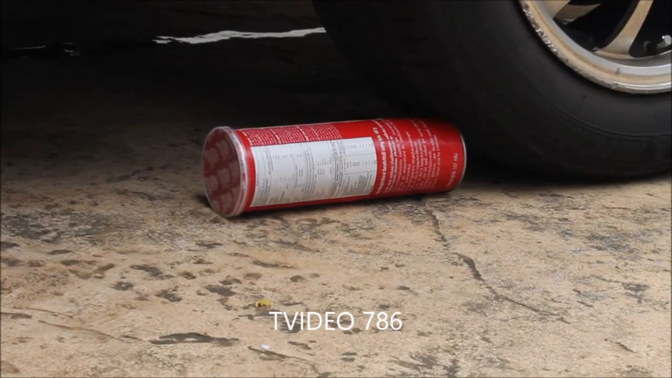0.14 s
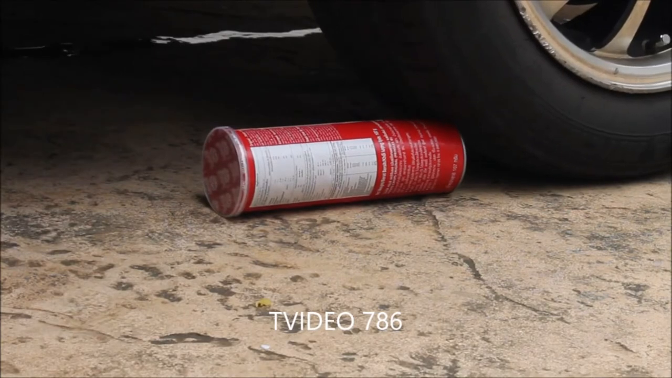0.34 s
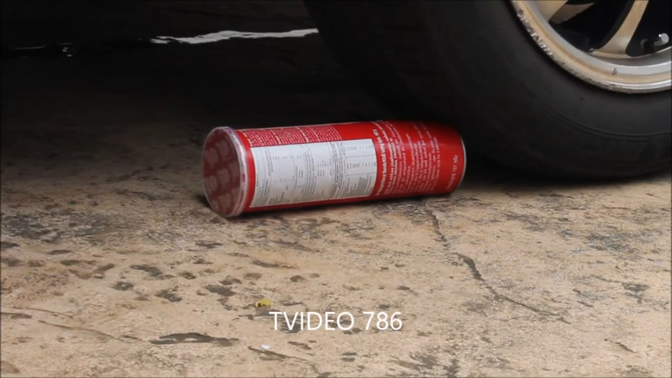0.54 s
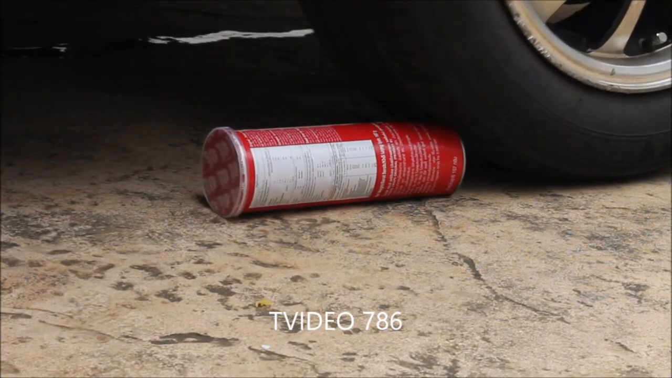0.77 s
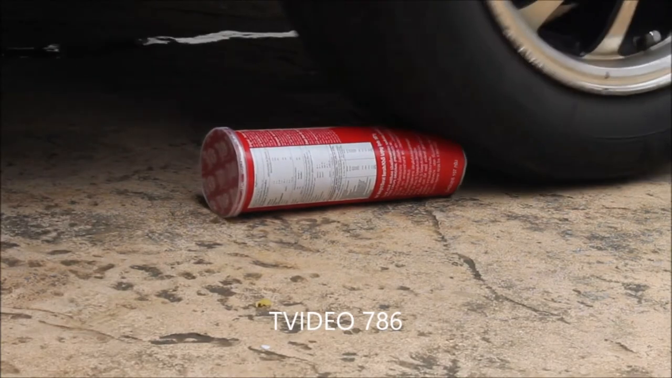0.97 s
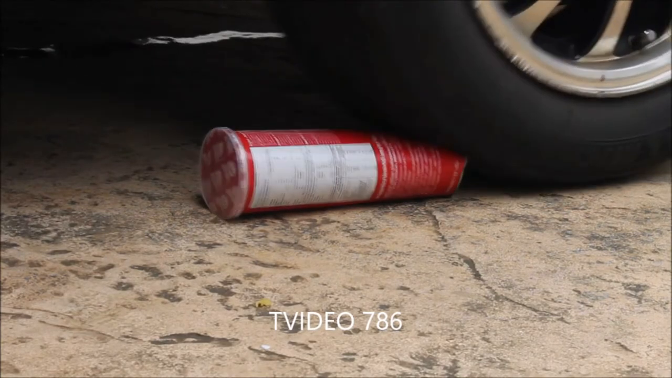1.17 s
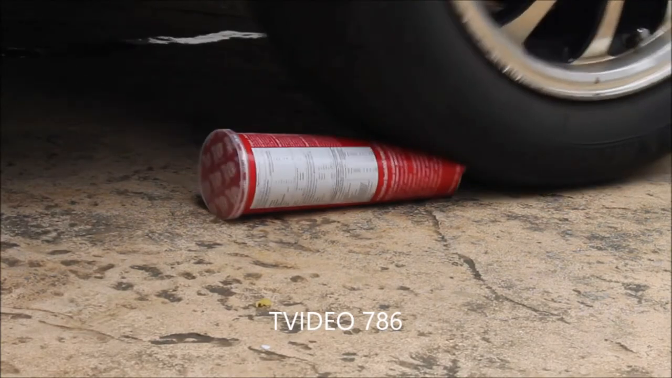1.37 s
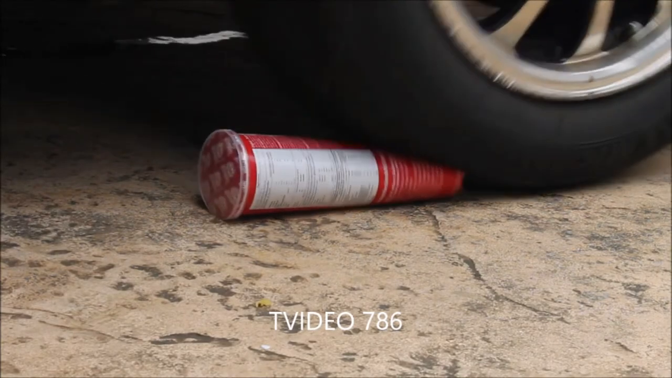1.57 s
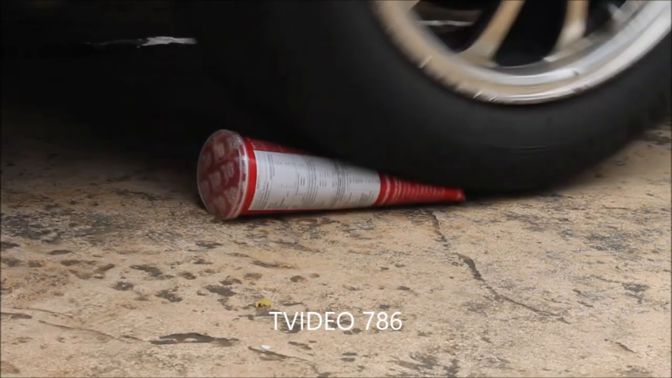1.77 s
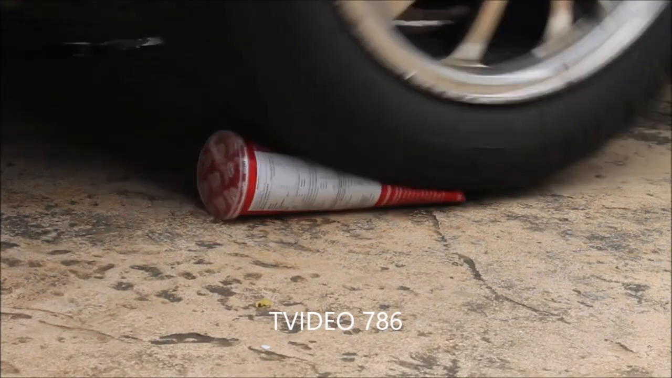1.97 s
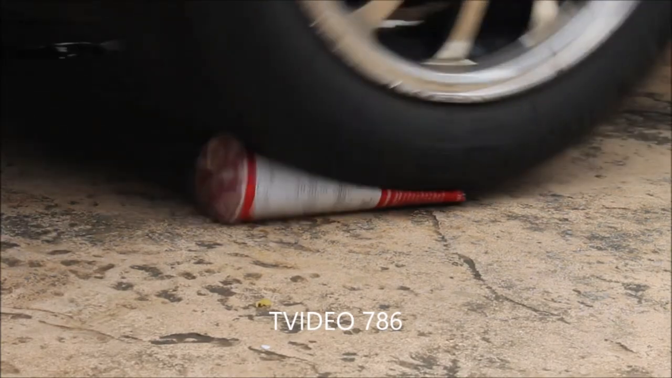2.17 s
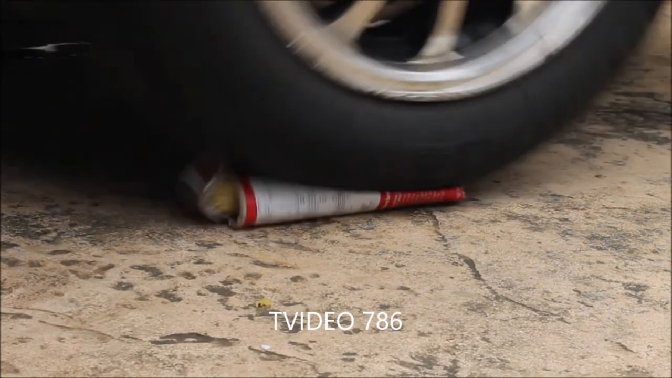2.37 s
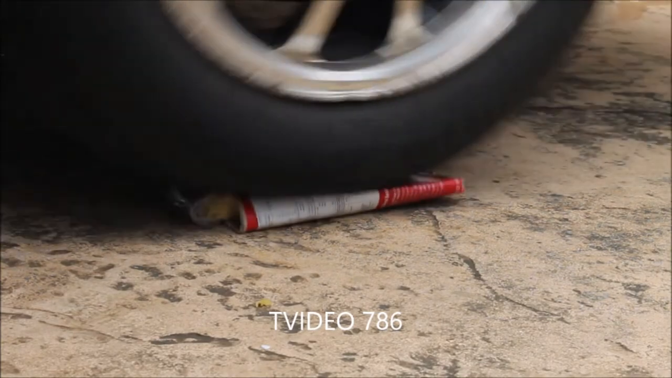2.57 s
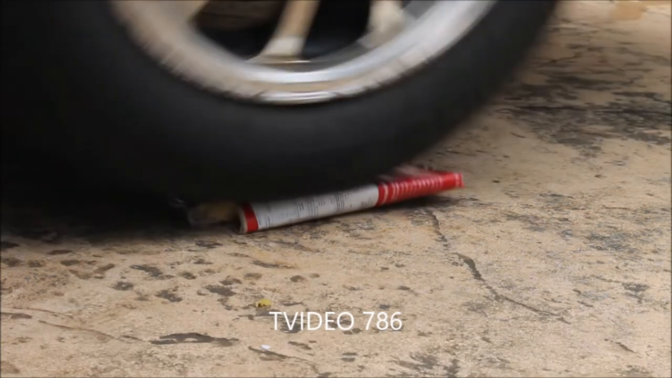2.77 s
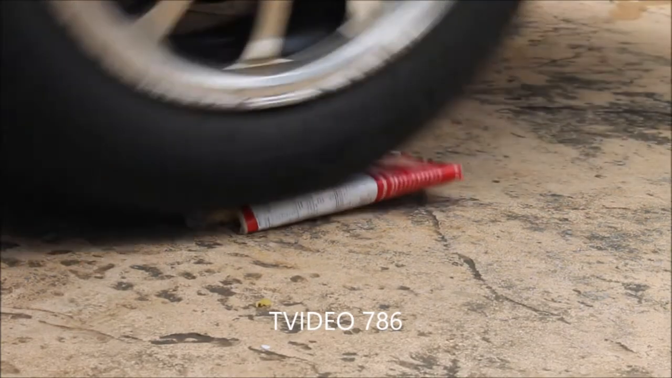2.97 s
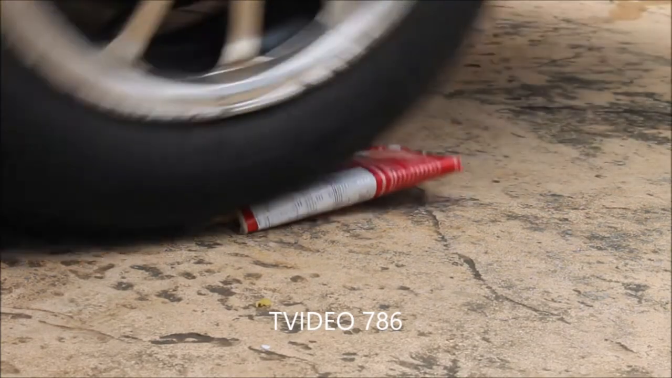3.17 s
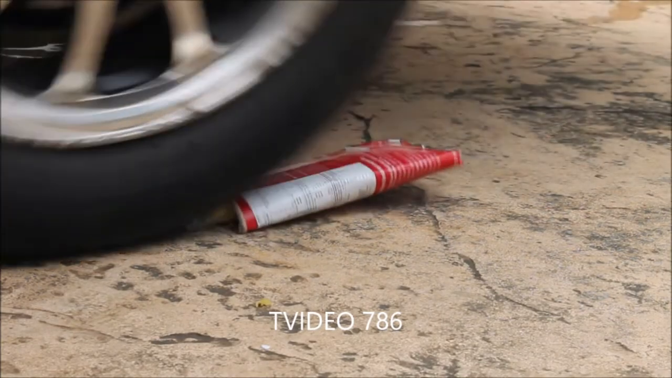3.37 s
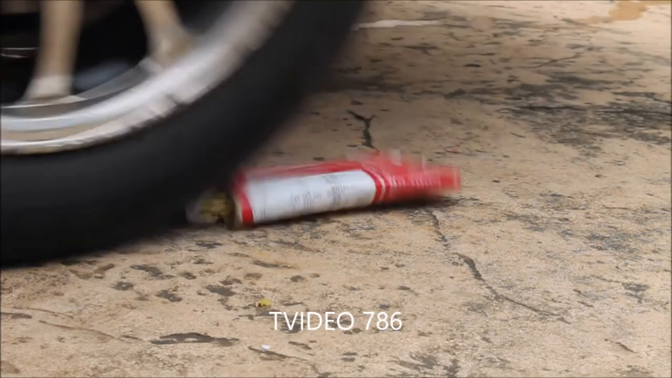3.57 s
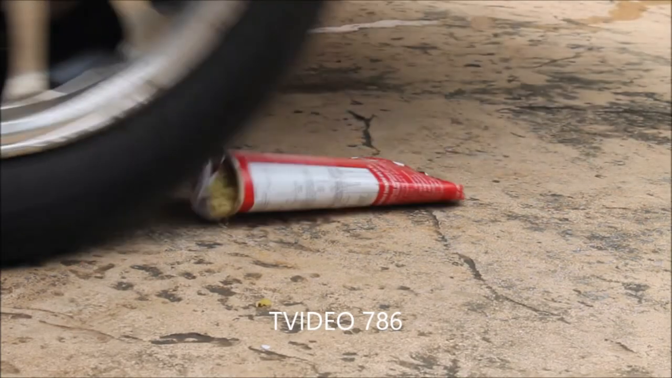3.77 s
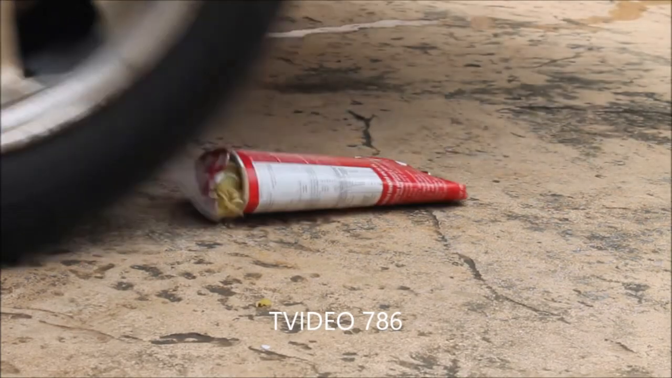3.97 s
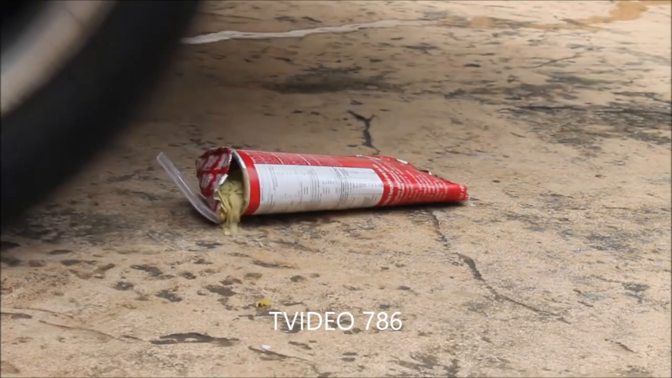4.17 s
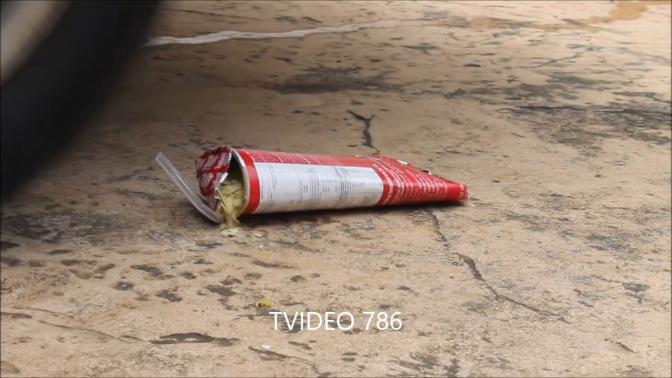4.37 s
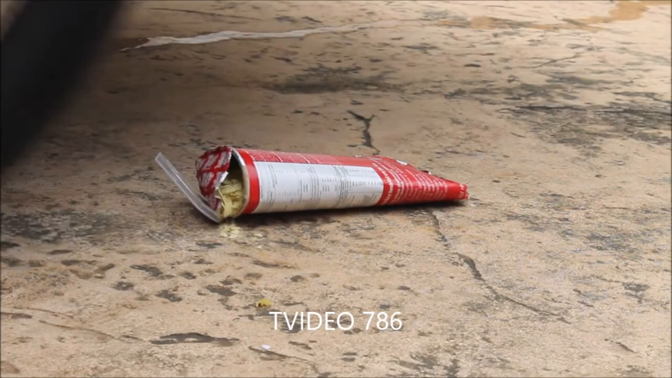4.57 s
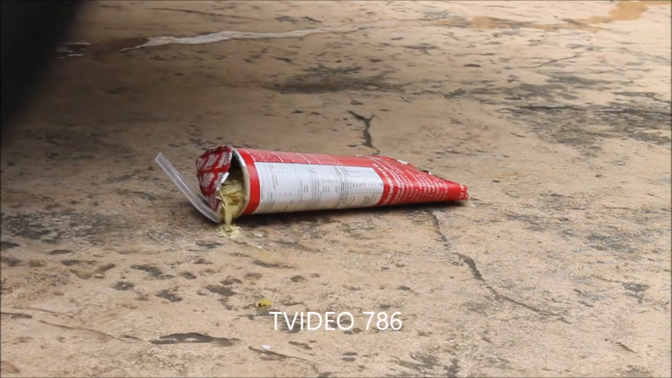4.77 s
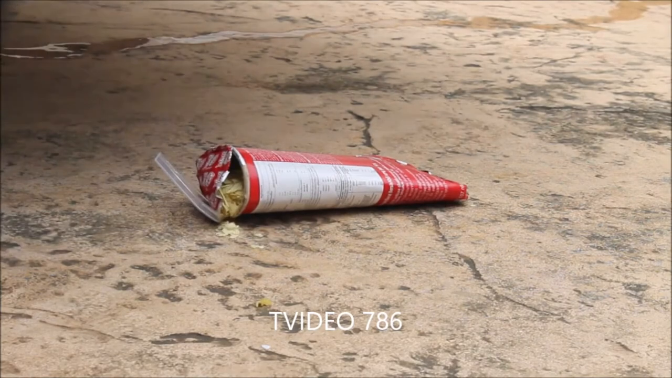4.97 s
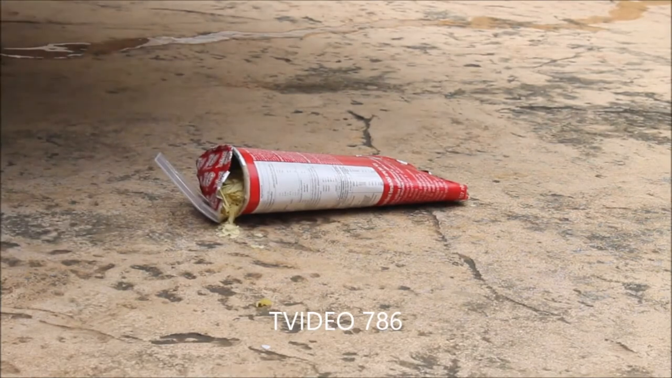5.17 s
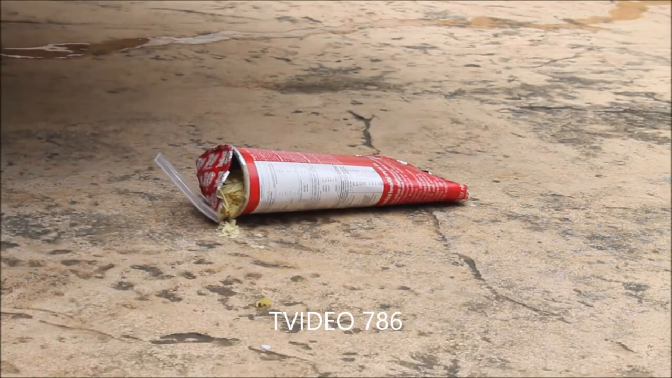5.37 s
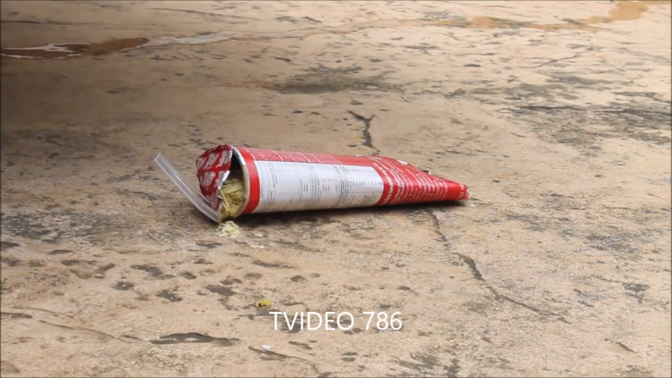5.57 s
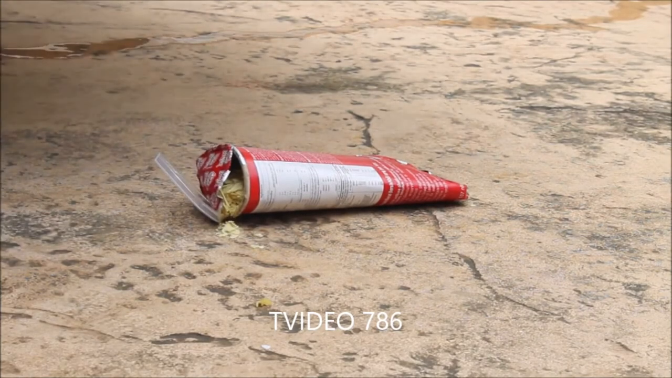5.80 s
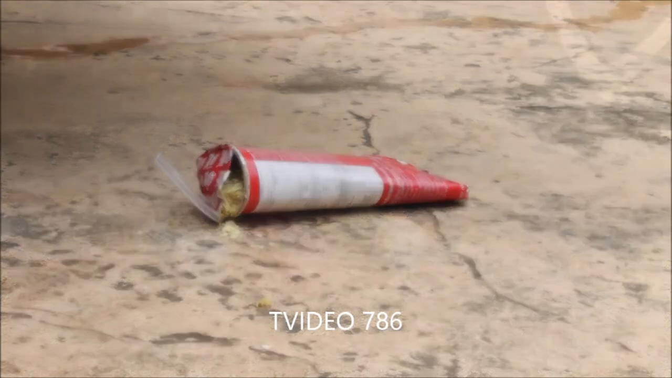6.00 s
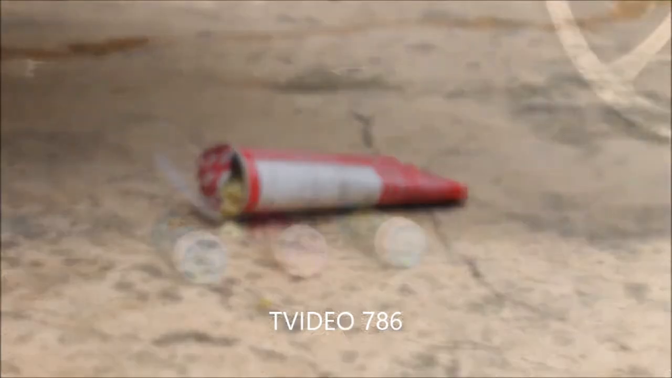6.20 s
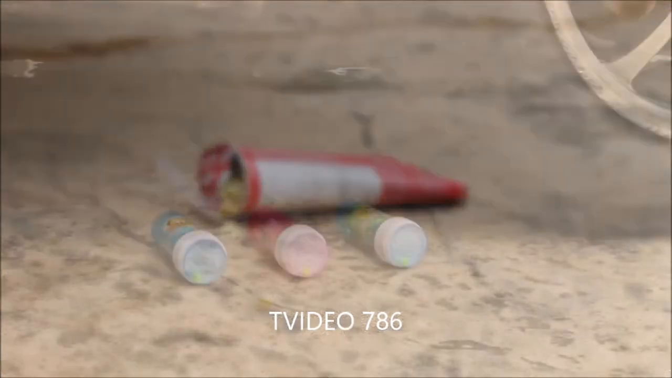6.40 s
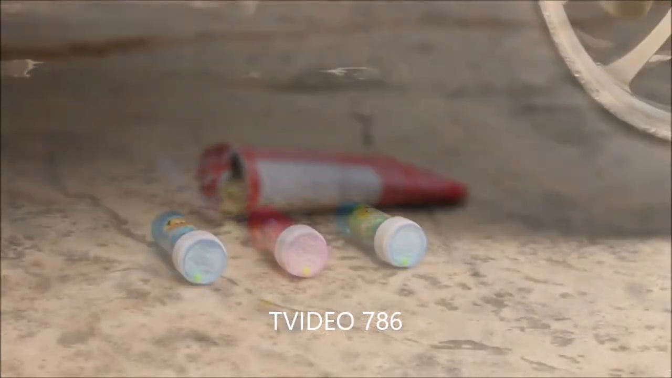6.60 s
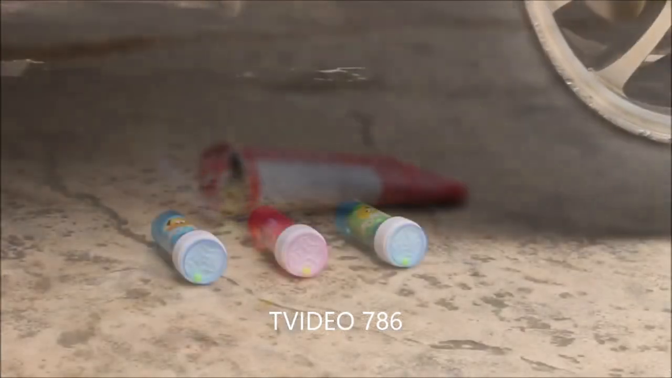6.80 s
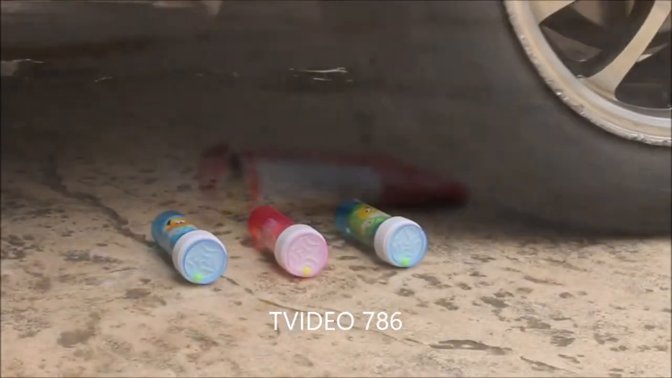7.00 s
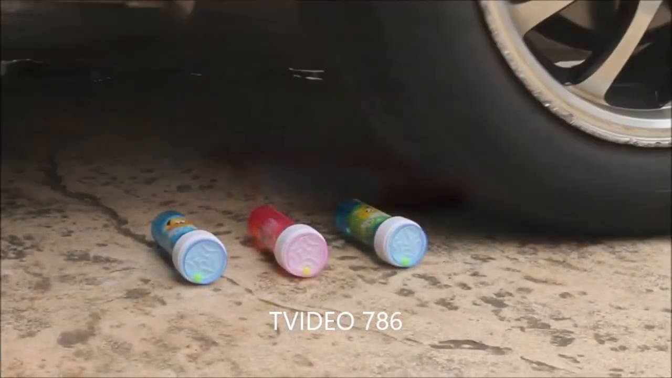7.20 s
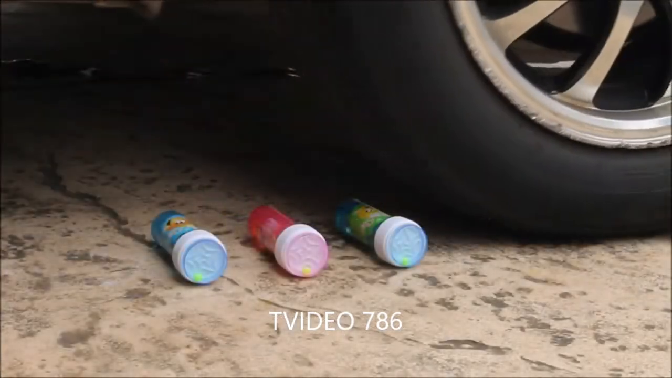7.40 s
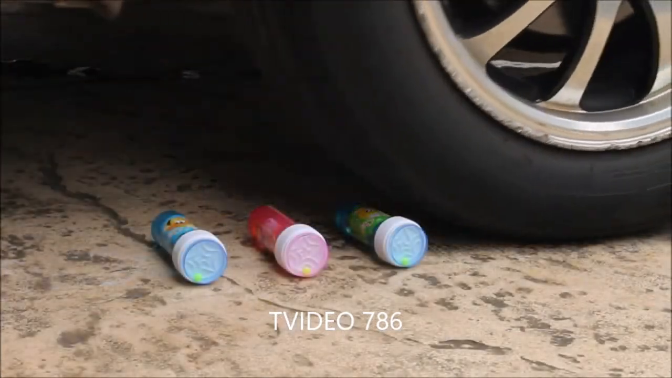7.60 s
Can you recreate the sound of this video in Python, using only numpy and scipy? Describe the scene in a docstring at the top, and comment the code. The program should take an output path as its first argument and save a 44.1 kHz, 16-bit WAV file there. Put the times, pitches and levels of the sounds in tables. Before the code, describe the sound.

A car creeps over concrete with a low engine throb and gritty rumble. After about a second, a cardboard tube of crisps bursts under the tyre with a very loud, close crack. It buckles with hollow thumps, then crunches and snaps for over two seconds. One small scrape follows, leaving only the rumble. Near the end, the sound switches abruptly to the brighter, steady hiss and hum of the waiting car.

```python
"""A cardboard tube of crisps is crushed on a concrete floor by a creeping car, its engine ticking over.
The tube bursts with a crack that overloads the microphone, buckles in steps and rings hollow until flat.
The crisps crunch by brittle fracture, the lid pops off, and once the tyre has left, the open end springs
back and skids. At six seconds the scene cuts to the car waiting, with a brighter, steady hiss."""
import sys
import numpy as np
from scipy import signal
from scipy.fft import rfft, irfft
from scipy.io import wavfile
from scipy.ndimage import uniform_filter1d

SR = 44100
rng = np.random.default_rng(int(sys.argv[2]) if len(sys.argv) > 2 else 0)


def digitize_waveform(pressure):
    """Quantize a signal to 16-bit integers and store it at the path in sys.argv[1].

    Rows of a 2-D input are taken as channels; values are limited to [-1, 1].
    """
    field = np.atleast_2d(pressure).T
    bounded = np.clip(field, -1, 1)
    quanta = np.round(bounded * 32767).astype(np.int16)
    wavfile.write(sys.argv[1], SR, quanta)


N = 337365
T = np.arange(N) / SR
BURST_S, FLAT_S, FREED_S = 1.01, 1.45, 3.6  # the tube bursts, lies flat and split, leaves the tyre
CUT_S = 6.033
ROLL = (0.082, 0.82, 2.41, 1.6)  # the car moves: start/s, attack/s, hold/s, release/s


def buckles(tail_t60=0.054, rustle_db=-13, rustle_t60=0.08, thump_cycles=8.8, sag=0.13):
    """Buckling: each fold of the wall tears, thumps and rustles; the pitch sags as stiffness is lost."""
    # folds: t/s, tear level/dB, tear duration/s, thump f/Hz, thump level/dB
    folds = [(0.402, -40, 0.0034, 128, -11), (0.7477, -31, 0.0028, 376, -2.5),
             (1.0078, -1, 0.0061, 152, 3.5), (1.0172, -13, 0.0033, 368, 0), (1.231, -9.5, 0.0031, 483, -12),
             (1.36, -12, 0.0048, 209, -5.5), (1.402, -14, 0.01, 400, -15), (1.419, -7.5, 0.0041, 443, 5),
             (2.252, -11, 0.0073, 286, -3.5), (2.406, -9, 0.0073, 332, 2.5), (2.418, -23, 0.0069, 254, -3),
             (2.428, -24, 0.0087, 100.5, -9), (2.665, -26, 0.006, 160, -16), (2.743, -22, 0.0082, 139, -8),
             (3.846, -21, 0.0049, 247, -8.5), (3.884, -20.5, 0.0044, 615, -18)]
    # spectrum of tearing cardboard: f/Hz, level/dB
    wall_spectrum = [(60, 5.5), (170, -11), (420, 5.5), (620, -6), (950, 4.5), (1300, -1), (1700, -0.5),
                     (2300, -11.5), (3300, -12), (5800, -31)]
    tears, thumps, t = np.zeros(N), np.zeros(N), T[:SR // 6]
    for s, tear_db, length, hz, thump_db in folds:
        swell = np.minimum(0.077 + 0.38 * t / length, 1) * fade(np.maximum(t - length, 0), tail_t60)
        swell += undb(rustle_db) * fade(t, rustle_t60)
        tear = colour(rng.standard_normal(len(t)) * swell, wall_spectrum)
        add(tears, s, undb(tear_db) * tear * np.sqrt(np.mean(swell ** 2)))
        t60 = thump_cycles / hz
        thump = sine(hz * (1 - sag * np.minimum(t / t60, 1))) * fade(t, t60)
        add(thumps, s + length / 4, undb(thump_db) * thump)
    return tears, thumps


def snap(hz, treble_db, ring_cycles=6.1, attack_cycles=1.06, spray_t60=0.011):
    """Sudden release of strain: a damped tone and a spray of splinters whose treble dies first; peak 1."""
    t = T[:SR // 16]
    onset = np.minimum(t * hz / attack_cycles, 1)
    spray = rng.standard_normal(len(t)) * onset
    tone = unit(onset * np.sin(2 * np.pi * hz * t) * fade(t, ring_cycles / hz))
    rattle = undb(-12.5) * fade(t, 0.035)  # the snap sets off its neighbours and rattles under the car
    splinters = undb(-3.5) * band(spray * (fade(t, spray_t60) + rattle), 550, 2270, order=5)
    edge = undb(treble_db) * band(spray * fade(t, 0.3 * spray_t60), 2200, 5630, order=2)
    sound = tone + splinters + edge
    return sound / np.abs(sound).max()


def snaps():
    """Brittle fracture: the largest breaks of wall and crisps stand out as single transients."""
    # breaks: t/s, peak level/dB, f/Hz, treble level/dB re the tone
    breaks = [(0.7482, -16, 600, -24), (1.0087, 4, 1300, -16), (1.0113, 7.5, 926, -12),
              (1.0138, 10.5, 1600, -13), (1.0225, -3, 900, -27), (1.0712, -5, 800, -44),
              (1.1052, 2.5, 910, -24), (1.156, -10, 780, -23), (1.2319, 1, 1740, -23),
              (1.343, 1, 1870, -10), (1.3613, 0, 1170, -23), (1.4205, 5, 1100, -17), (1.425, -1, 1410, -5),
              (1.5225, -5, 1418, -12), (1.5653, -2.5, 1970, -1), (1.6502, 2, 1400, -10),
              (1.66, -10, 1750, -18), (1.6923, -3, 1100, -10), (1.701, -3, 930, -12),
              (1.7275, -7, 2000, -13), (1.7657, 0.5, 2070, -26), (1.818, -6, 910, -16),
              (1.8329, -4, 1630, -18), (1.8494, -7, 1530, -23), (1.913, -5, 730, -18),
              (1.9778, -3, 800, -28), (2.003, -0.5, 1730, -12), (2.017, -6, 880, -20),
              (2.0448, -4, 1957, -8), (2.0620, -14, 1280, -12), (2.0782, -2, 1940, -21),
              (2.096, 0.5, 645, -23), (2.1907, -3.5, 2300, 1), (2.2862, 1.5, 1640, -10),
              (2.3355, -1, 1900, -4), (2.3635, -8, 842, -9), (2.5399, -2, 670, -14),
              (2.5853, -1, 1450, -15), (2.622, -1, 1500, -8), (2.6364, -0.5, 1700, -15),
              (2.658, -8.5, 4800, 11), (2.695, -3, 1940, 0), (2.7393, -2, 1910, -8),
              (2.7993, -1.5, 750, -12), (2.8143, -11, 1500, 6), (2.91, -12, 3160, -1), (3, -10, 1410, -11),
              (3.0402, -5, 1240, -23), (3.047, -6, 1050, -18), (3.053, -10, 760, -17),
              (3.0821, 1, 1160, -15), (3.134, -6.5, 1210, -6), (3.178, -7.5, 740, -21),
              (3.1940, -15, 1680, -12), (3.3189, -8, 1550, -9), (3.3979, -7, 1900, -5),
              (3.474, -14, 1310, -19), (3.6144, -6, 1150, -21), (3.626, -13, 670, -18),
              (3.661, -10.5, 1400, -19), (3.681, -17.5, 1700, -20), (3.8478, -8, 835, -28)]
    out = np.zeros(N)
    for s, db, hz, treble_db in breaks:
        add(out, s, undb(db) * snap(hz, treble_db))
    return out


def crunch(body_db=-1.05, crisp_db=1.5, bunching_db=1.5):
    """Fracture avalanches: crisps break in swarms, muffled by the tube until it splits open."""
    # course of the crunch along the tube: t/s, relative body level/dB, relative treble level/dB
    course = [(1.46, -22, -37), (1.53, -17.5, -30.5), (1.78, -16, -26), (1.95, -17.5, -31),
              (2.06, -14.5, -27), (2.13, -19, -27), (2.25, -17.5, -25), (2.31, -22, -29),
              (2.39, -17, -27.5), (2.46, -22.5, -32), (2.55, -17.5, -26), (2.72, -18, -24),
              (2.9, -18.5, -26), (3.1, -21.5, -30.5), (3.33, -21.5, -31), (3.46, -24.5, -41),
              (3.58, -45, -61)]
    # spectrum of breaking crisps: f/Hz, level/dB
    crisp_spectrum = [(80, -4), (160, -9.5), (260, 5), (380, 2.5), (700, 0.5), (1150, 1), (1950, 1.5),
                      (2550, -11.5), (3100, -9.5), (4200, -17.5), (5700, -23.5)]
    times, body_levels, treble_levels = np.transpose(course)
    body_gain = undb(np.interp(T, times, body_levels) + body_db)
    closed = np.interp(T, [BURST_S, FLAT_S], [1, 0])
    since_flat = np.maximum(T - FLAT_S, 0)
    bass_db = 3.5 * closed - 8 * (1 - closed) - 0.5 * since_flat
    smother_db = -1.5 * closed - 2 * since_flat  # the tyre covers more and more of the tube
    treble_db = np.interp(T, times, treble_levels) + crisp_db - 16 * closed

    avalanche = undb(1.8 * np.minimum(walk(rate=180), 1.5))
    breaks = fractures(rate=2600, spread_db=3.5) * avalanche
    crumbs = fractures(rate=650, spread_db=2.0) * undb(2 * walk(rate=140))
    ringing = undb(-4) * chips()
    breaking = colour(breaks, crisp_spectrum) + ringing
    bass = band(breaking, 49, 460) * undb(bass_db)
    middle = band(breaking, 583, 2370)
    upper = signal.sosfiltfilt(signal.butter(3, 1200, "high", fs=SR, output="sos"), middle)
    middle = middle - upper + upper * undb(smother_db)
    treble = band(colour(breaks + 0.65 * crumbs, crisp_spectrum) + 0.5 * ringing, 2600, 6200)
    treble *= undb(treble_db + bunching_db * walk(rate=40))
    pressed = (T > BURST_S) & (T < FREED_S)
    return pressed * (body_gain * bass + collapse_gain() * (body_gain * middle + treble))


def chips(count=3600, cycles=7, spread_db=1.5, lo_hz=520, hi_hz=5600, size=400):
    """Free vibration: larger pieces ring for a few cycles as they break, each at its own frequency."""
    when, pitch, strength = rng.random((count, 3)).T[:, :, None]
    span, t = FREED_S - BURST_S, T[:size]
    hz = lo_hz * (hi_hz / lo_hz) ** pitch
    gain = undb(-spread_db * np.log(0.042 + strength))  # many weak, a few strong
    grains = gain * np.sin(2 * np.pi * hz * t) * fade(t, cycles / hz)
    index = ((BURST_S + when * span) * SR).astype(int) + np.arange(size)
    return unit(np.bincount(index.ravel(), grains.ravel(), N)) * np.sqrt(span / T[-1])


def collapse_gain(attack_s=0.003, release_s=0.015, lull_share=0.5, lull_s=0.02):
    """Load relief: the crunch jumps in level as a stack of crisps collapses, then swings the other way."""
    # collapsing stacks: t/s, duration/s, change of level/dB
    stacks = [(1.014, 0.031, 1), (1.07, 0.012, -3), (1.404, 0.036, 0), (1.537, 0.025, 2.5),
              (1.687, 0.018, 3.5), (1.757, 0.011, -1), (1.826, 0.014, 1), (2.045, 0.017, 1.5),
              (2.152, 0.011, 2), (2.244, 0.028, 1), (2.353, 0.0083, 1), (2.395, 0.018, 2.5),
              (2.684, 0.012, 1), (2.74, 0.029, 1.5), (3.045, 0.017, 1.5), (3.125, 0.011, 0),
              (3.178, 0.024, 1.5), (3.392, 0.012, 1)]
    change_db = np.zeros(N)
    for s, length, db in stacks:
        lull = gesture(s + length, release_s, lull_s, lull_s)
        change_db += db * (gesture(s, attack_s, length, release_s) - lull_share * lull)
    return undb(change_db)


def tube_resonance(tears, cracks, warp=0.039):
    """Modal resonance: tears and breaks ring the hollow tube; its modes wander as the wall deforms."""
    # air and wall modes: f/Hz, relative level/dB, t60/s
    modes = [(147, 11, 0.063), (239, 9.5, 0.074), (415, 4, 0.045), (603, 12.5, 0.03), (843, 18, 0.02),
             (1068, 3.5, 0.058), (1540, -7, 0.03), (1770, -10.5, 0.13), (2010, -11.5, .06)]
    crumpling = undb(-19.5) * gesture(0.93, 0.08, 0.26, 0.53) ** 2
    reopening = undb(-32) * gesture(3.58, 0.04, 0.27, 0.08)
    creases = fractures(rate=2500, spread_db=0.5) * (crumpling + reopening)
    has_air = (T < FLAT_S) | (T > FREED_S)
    drive = creases + undb(-22) * tears + undb(-24) * cracks * has_air
    body = sum(undb(db) * ring(drive, hz * (1 + warp * walk(rate=9.3)), t60) for hz, db, t60 in modes)
    return body / np.sqrt(sum(undb(db) ** 2 * ring_energy(t60) for hz, db, t60 in modes))


def groans(wobble_share=0.09, rough_db=3):
    """Friction: the folding wall rubs on itself in rough tones that glide as the fold moves."""
    # rubs: t/s, duration/s, starting f/Hz, final f/Hz, level/dB
    rubs = [(1.02, 0.027, 345, 290, -23), (1.07, 0.051, 385, 420, -19), (1.145, 0.033, 754, 800, -19),
            (1.18, 0.052, 231, 288, -14), (1.21, 0.044, 530, 480, -14.5), (1.378, 0.043, 411, 436, -12.5)]
    out, wobble, grip = np.zeros(N), walk(rate=370), walk(rate=260)
    for s, length, start_hz, end_hz, db in rubs:
        t = T[:int(length * SR)]
        now = int(s * SR) + np.arange(len(t))
        hz = np.interp(t, [0, length], [start_hz, end_hz]) * (1 + wobble_share * wobble[now])
        swell = np.sqrt(np.sin(np.pi * t / length)) * undb(rough_db * grip[now])
        add(out, s, undb(db) * swell * sine(hz))
    return out


def lid_pop(s=2.3404, peak_db=1, hz=2500):
    """Impulsive radiation: the lid jumps off the rim with a pressure pulse one cycle long."""
    phase = 2 * np.pi * hz * (T - s)
    return undb(peak_db) * -phase * np.exp((1 - phase ** 2) / 2)


def skid(level_db=-26):
    """Stick-slip friction: the freed end catches on the concrete and its crumpled wall rings briefly."""
    # modes of the crumpled end: f/Hz, relative level/dB, t60/s
    modes = [(253, -1.5, 0.045), (554, -4, 0.033), (670, -5.5, 0.035), (797, 2, 0.019), (1230, -5, 0.018)]
    slips = fractures(rate=900, spread_db=4.0) * gesture(3.84, 0.008, 0.015, 0.09)
    body = sum(undb(db) * ring(slips, hz, t60) / np.sqrt(ring_energy(t60)) for hz, db, t60 in modes)
    return undb(level_db) * body


def engine_throb(firing_hz=47.8, idle_db=-32.5, load_rise_db=9.5, fade_db_per_s=9.5):
    """Periodic firing: an unsteady low tone swells under load and recedes after the cut."""
    load = gesture(0.039, 0.5, 0.068, 0.39)
    level_db = idle_db + load_rise_db * load - fade_db_per_s * np.maximum(T - CUT_S, 0)
    tone = sine(firing_hz + 3.5 * walk(rate=19))
    return unit(tone * undb(3.6 * walk(rate=18))) * undb(level_db)


def rolling_noise(idle_db=-26.5, rise_db=4.5):
    """Broadband noise: the gritty rumble of tyre and engine grows while the car moves."""
    # spectrum of the creeping car: f/Hz, level/dB
    spectrum = [(12, -35.5), (20, -11.5), (44, -9.5), (60, -15), (76, -12), (113, -10), (209, -9),
                (241, -11.5), (329, -11), (427, -13.5), (492, -14), (772, -18), (1810, -26.5),
                (4060, -40.5), (5800, -51), (7540, -75), (12800, -120)]
    grit = rng.standard_normal(N) + 0.47 * fractures(rate=900, spread_db=6.5)
    return colour(grit, spectrum) * undb(idle_db + rise_db * gesture(*ROLL) + 0.81 * walk(rate=20))


def tyre_scuff(roll_db=-41.5, nudge_db=-34):
    """Granular friction: sand grinds between rubber and concrete as the tyre rolls and nudges the tube."""
    spectrum = [(200, -19), (900, 4.0), (2000, 0.5), (2700, -17.5), (5800, -30.5)]  # f/Hz, level/dB
    grind = colour(fractures(rate=4800, spread_db=11.0), spectrum)
    nudge = gesture(0.345, 0.063, 0.027, 0.055)
    return grind * (undb(roll_db) * gesture(*ROLL) + undb(nudge_db) * nudge)


def waiting_car(hiss_db=-25):
    """Broadband and narrowband noise: the fan hisses while the engine hums and whines in wavering tones."""
    # spectrum of fan and engine: f/Hz, level/dB
    spectrum = [(20, 3), (45, -26), (65, -3), (100, -4.5), (200, -1), (350, -5), (470, -3.5), (620, -5.5),
                (1400, -7.5), (2600, -14), (6200, -23.5), (8800, -25.5), (11500, -33), (14500, -41)]
    # hum and whine: f/Hz, bandwidth/Hz, level/dB
    tones = [(160.6, 20, -36.5), (197, 18, -37.5), (1074, 34, -37.5), (1319, 13, -40), (2087, 9.2, -43.5)]
    out = colour(rng.standard_normal(N), spectrum) * undb(hiss_db + 0.31 * walk(rate=12))
    for hz, width_hz, db in tones:
        t60 = np.log(1000) / (np.pi * width_hz)
        out += undb(db) * unit(ring(rng.standard_normal(N), hz, t60))
    return out


def fractures(rate, spread_db):
    """Shot noise: about `rate` impulses a second, many weak and a few strong; rms 1."""
    size = undb(spread_db * np.minimum(rng.standard_normal(N), 2))
    return unit((rng.random(N) < rate / SR) * size * rng.choice([-1, 1], N))


def walk(rate):
    """Random modulation: `rate` levels a second, smoothed twice; rms 1."""
    step = int(SR / rate)
    held = np.repeat(rng.standard_normal(N // step + 1), step)
    return unit(uniform_filter1d(uniform_filter1d(held, step), step)[:N])


def ring(x, hz, t60):
    """Forced vibration of one damped mode driven by x; its frequency may move."""
    turn = np.exp(2j * np.pi * np.cumsum(hz * np.ones(len(x))) / SR)
    return (turn * signal.lfilter([1], [1, -fade(1 / SR, t60)], x / turn)).imag


def ring_energy(t60):
    """Energy of a damped mode's impulse response."""
    return t60 * SR / (4 * np.log(1000))


def sine(hz):
    """Oscillation whose phase is the integral of its frequency."""
    return np.sin(2 * np.pi * np.cumsum(hz) / SR)


def colour(x, spectrum, size=4096):
    """Minimum-phase filter through (f/Hz, level/dB) points; rms 1."""
    hz, db = np.transpose(spectrum)
    bins = np.maximum(np.fft.rfftfreq(size, 1 / SR), 1)
    cepstrum = irfft(np.log(undb(np.interp(np.log(bins), np.log(hz), db))))
    cepstrum[1:size // 2] *= 2
    cepstrum[size // 2 + 1:] = 0
    response = irfft(np.exp(rfft(cepstrum)))
    return unit(signal.fftconvolve(x, response)[:len(x)])


def band(x, lo_hz, hi_hz, order=3):
    """Band-pass filter; rms 1."""
    return unit(signal.sosfilt(signal.butter(order, [lo_hz, hi_hz], "band", fs=SR, output="sos"), x))


def lowpass(x, hz):
    """Steep elliptic low-pass filter."""
    return signal.sosfilt(signal.ellip(10, .2, 80, hz, fs=SR, output="sos"), x)


def gesture(start, attack, hold, release):
    """Trapezoidal envelope from 0 to 1 and back; times in seconds."""
    return np.interp(T, start + np.cumsum([0, attack, hold, release]), [0, 1, 1, 0])


def fade(t, t60):
    """Exponential decay by 60 dB in t60."""
    return np.exp(-np.log(1000) * t / t60)


def undb(db):
    """Decibels to amplitude ratio."""
    return 10 ** (np.asarray(db) / 20)


def unit(x):
    """Normalisation to rms 1."""
    return x / np.sqrt(np.mean(x ** 2) + 1e-18)


def add(track, s, sound):
    """Superpose a sound on the track at s seconds."""
    i = int(s * SR)
    track[i:i + len(sound)] += sound[:N - i]


def scene():
    """Superposition: the crushing, then the cut to the waiting car; the engine throbs under both."""
    throb, rolling, waiting = engine_throb(), rolling_noise(), waiting_car()
    tears, thumps = buckles()
    cracks = snaps()
    crushing = crunch() + tears + thumps + cracks + tube_resonance(tears, cracks)
    crushing += groans() + lid_pop() + skid()
    return (throb + np.where(T < CUT_S, rolling + tyre_scuff() + crushing, waiting))[None]


def record(dry, headroom=1.11, narrow_hz=5800, top_hz=14600):
    """Saturation: before the cut, peaks are rounded and the band is narrow; the loudest cracks overload."""
    narrow = lowpass(headroom * np.tanh(dry / headroom), narrow_hz)
    return lowpass(np.clip(np.where(T < CUT_S, narrow, dry), -1, 1), top_hz)


dry = scene()
out = record(dry)
digitize_waveform(out)
```